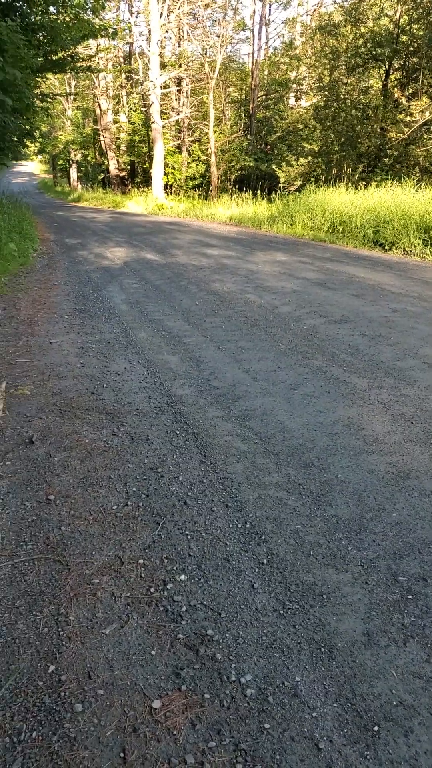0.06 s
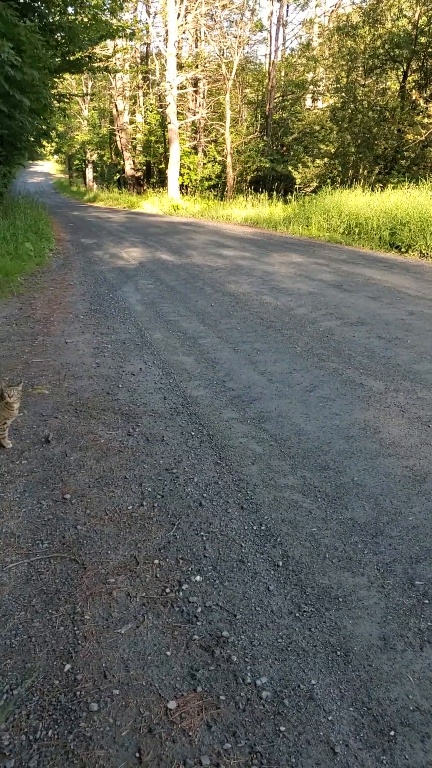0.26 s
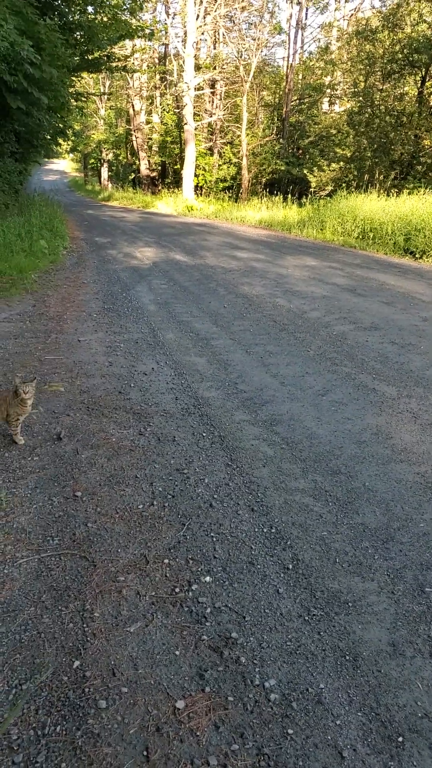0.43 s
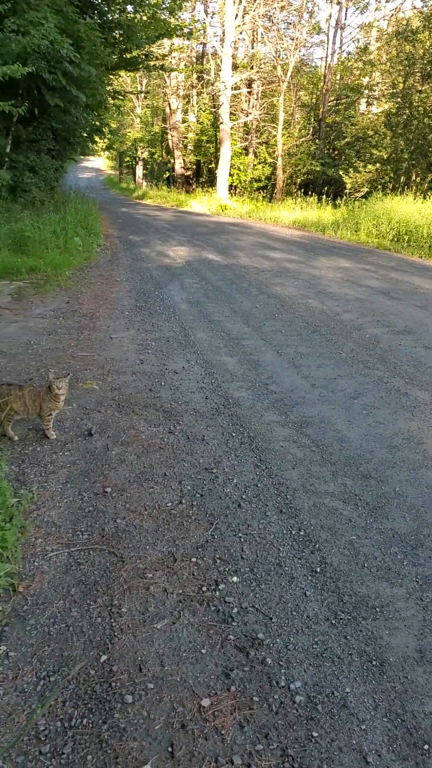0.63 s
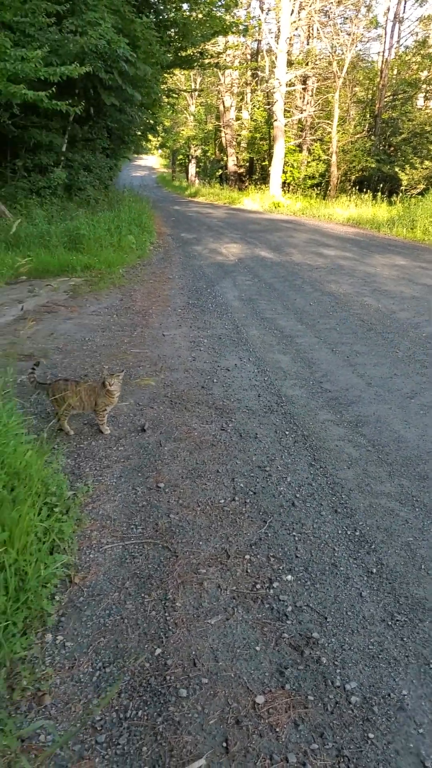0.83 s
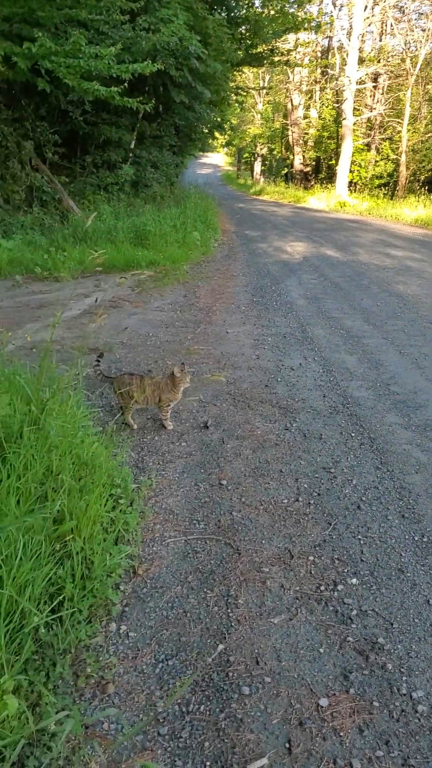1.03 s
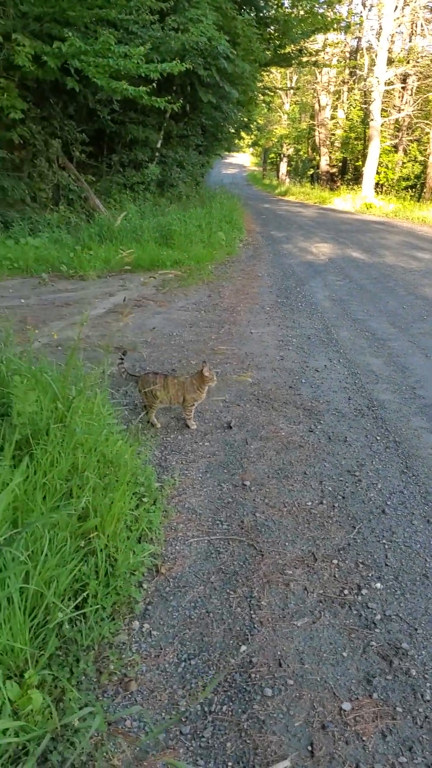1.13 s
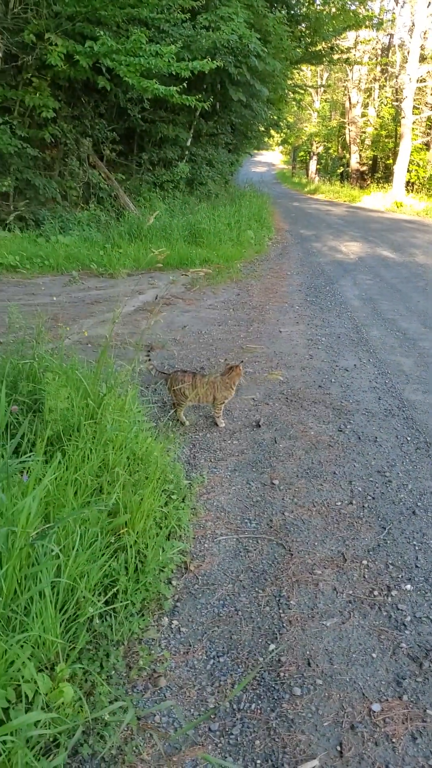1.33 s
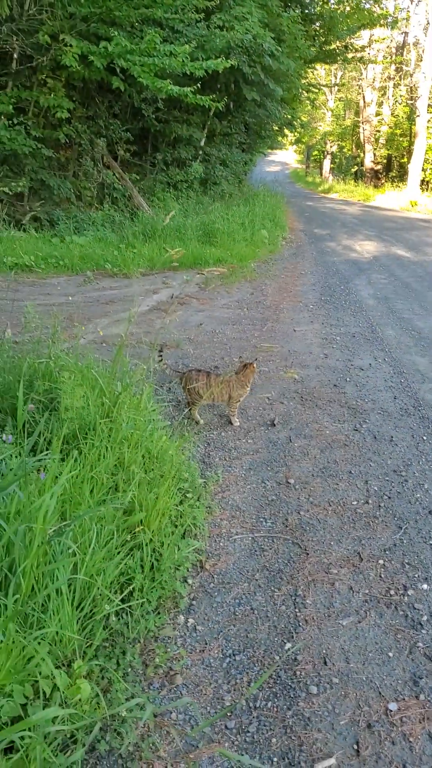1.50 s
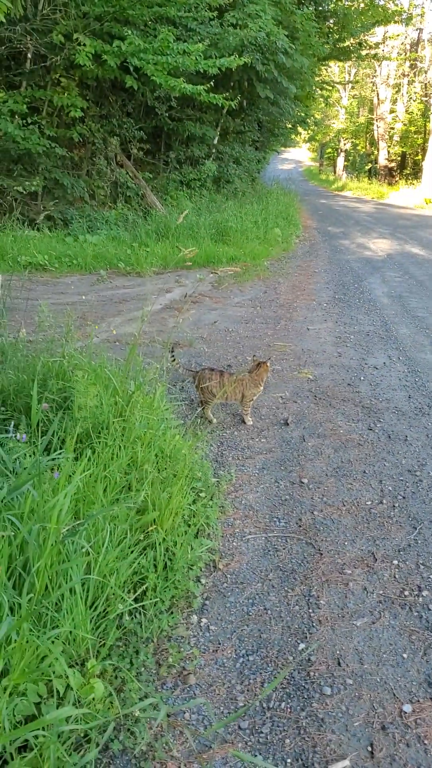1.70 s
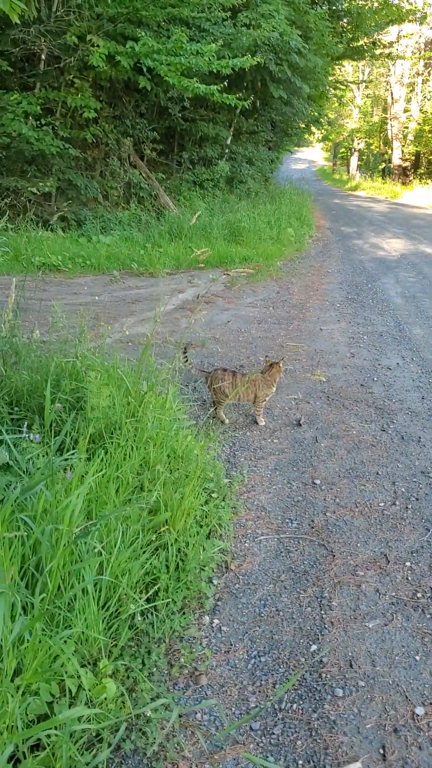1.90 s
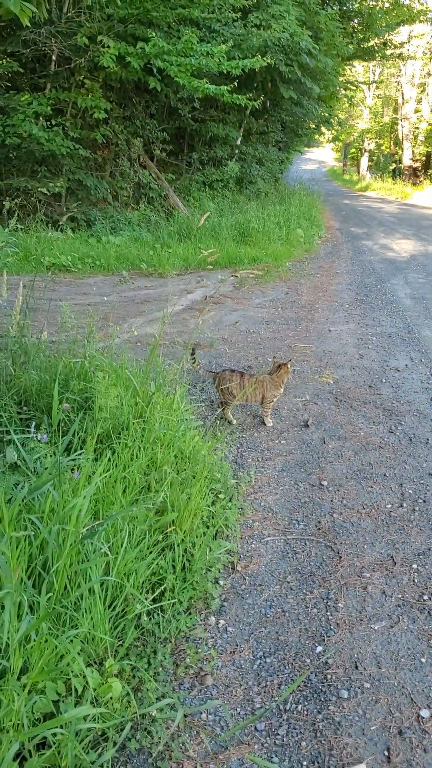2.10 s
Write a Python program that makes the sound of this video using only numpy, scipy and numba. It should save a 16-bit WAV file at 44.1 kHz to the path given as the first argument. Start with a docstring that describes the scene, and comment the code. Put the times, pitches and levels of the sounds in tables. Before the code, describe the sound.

Gravel grinds under slow steps as someone walks outdoors and then stops. Small stones click, scrape and clink, while fabric rustles and low handling bumps come through the close, handheld microphone. The surroundings are very quiet.

```python
"""Gravel crunches under slow steps: someone walks a road holding a phone and stops near the end.
Soles grind the stones, clothing swishes close by, single pebbles click, scrape and clink.
Steps thud through the low modes of the phone's body; the shifting grip rumbles between them.
The outdoor air is almost silent; a faint hum sets in at the end."""
import sys
import numpy as np
from scipy import signal
from scipy.fft import rfft, irfft
from scipy.io import wavfile
from scipy.ndimage import uniform_filter1d
from numba import njit

SR = 44100
rng = np.random.default_rng(int(sys.argv[2]) if len(sys.argv) > 2 else 0)


def persist_wave(psi):
    """Save psi, clipped to +-1, as 16-bit WAV."""
    counts = np.round(np.clip(psi, -1, 1) * 32767).astype(np.int16)
    wavfile.write(sys.argv[1], SR, np.atleast_2d(counts).T)


N = 94815

# limits of the low, middle and treble bands: edge_hz
EDGES_HZ = (260, 1400, 7500, 17000)
PORT_LAG_S = 0.000115  # left microphone port behind the right


def undb(db):
    """Decibels to gain."""
    return 10 ** (np.asarray(db) / 20)


def unit(x):
    """Scale to an rms of 1."""
    return x / np.sqrt(np.mean(x ** 2) + 1e-20)


def steady(x, samples):
    """Even out the level over a sliding window."""
    return x / np.sqrt(uniform_filter1d(np.mean(x ** 2, axis=0), size=samples) + 1e-12)


def colour(x, points, db_scale=1):
    """Minimum-phase filter through (freq_hz, gain_db) points."""
    size = 2 ** 17
    hz, db = np.array(points, float).T
    bins_hz = np.fft.rfftfreq(size, 1 / SR)
    gain = undb(db_scale * np.interp(np.log(bins_hz + 1), np.log(hz + 1), db))
    cepstrum = irfft(np.log(gain))
    cepstrum[1:size // 2] *= 2
    cepstrum[size // 2 + 1:] = 0
    return irfft(rfft(x, size) * np.exp(rfft(cepstrum)))[..., :N]


def stereo_noise(likeness):
    """Partly correlated noise that reaches the left port late."""
    mid, side = rng.standard_normal((2, N))
    mid *= np.sqrt((1 + likeness) / 2)
    side *= np.sqrt((1 - likeness) / 2)
    return np.array([np.roll(mid + side, round(PORT_LAG_S * SR)), mid - side])


def narrow_noise(hz, width_hz):
    """Unsteady band of noise around a pitch."""
    lowpass = signal.butter(2, width_hz / 2, fs=SR, output="sos")
    slow = signal.sosfilt(lowpass, rng.standard_normal((2, N)))
    carrier = np.exp(2j * np.pi * np.cumsum(hz * np.ones(N)) / SR)
    return unit(((slow[0] + 1j * slow[1]) * carrier).real)


def swell(peak_s, rise_s, fall_s):
    """Power of a push: grows to a peak, then dies ever faster, as when stones lock."""
    t = np.arange(N) / SR
    settling = 0.062
    away = np.maximum((peak_s - t) / rise_s, (t - peak_s) / fall_s).clip(max=20)
    return np.exp(-2 * (away + settling * np.maximum(away - 1, 0) ** 2))


@njit
def ring(start_s, hz, decay_s, size):
    """Sum of short damped sines."""
    out = np.zeros(N)
    for k in range(len(start_s)):
        first = int(start_s[k] * SR) + 1
        pole = 2j * np.pi * hz[k] / SR - 1 / (decay_s[k] * SR)
        phasor = size[k] * np.exp(pole * (first - start_s[k] * SR))
        step = np.exp(pole)
        for i in range(max(first, 0), min(N, first + int(6 * decay_s[k] * SR))):
            out[i] += phasor.imag
            phasor *= step
    return out


def grains(band, scatter_db):
    """Tiny contacts, each with its own pitch, size and direction; a few loose ones ring on."""
    # contacts per band, low to high: rate_per_s, decay_s
    contacts = [(600, 0.0021), (3200, 0.0007), (10000, 0.00007)]
    loose_share, loose_decay_s, loose_top_hz = 0.05, 0.015, 4160
    rate_per_s, decay_s = contacts[band]
    low_hz, high_hz = EDGES_HZ[band:band + 2]
    count = int(rate_per_s * N / SR)
    when, pitch, strength, polarity, damping, pan, lag = rng.random((24000, 7))[:count].T
    start_s = when * N / SR
    hz = low_hz + (high_hz - low_hz) * pitch
    loose = (damping < loose_share) & (hz < loose_top_hz)
    decays_s = np.where(loose, loose_decay_s, decay_s * (.5 + damping))
    size = undb(-scatter_db * np.log(np.maximum(strength, .01))) * np.sign(polarity - .5)
    size *= (decay_s / decays_s) ** .22
    pan_db = 4 * (2 * pan - 1)
    lag_s = PORT_LAG_S + .00007 * (2 * lag - 1)
    left = ring(start_s + lag_s, hz, decays_s, size * undb(pan_db))
    right = ring(start_s, hz, decays_s, size * undb(-pan_db))
    return steady(np.array([left, right]), samples=800)


def friction(pushes, scatter_db, hiss_db):
    """Grains over fine hiss in three bands, swelling with each push."""
    # spectrum of the rubbing: freq_hz, gain_db
    spectrum = [(330, -3), (410, -3), (478, 6.5), (630, -12), (720, -1.5), (820, 3.5), (960, -3),
                (1350, 2.5), (2200, 5.5), (2900, 5.5), (4400, 1), (6200, 0), (7700, -19), (9500, -21),
                (12800, -10), (16000, -19)]
    # hiss per band, low to high: left_right_correlation
    likeness = [0.92, 0.21, 0.21]
    power = sum(undb(db + np.array([[low_db], [0], [treble_db]])) ** 2 * swell(peak_s, rise_s, fall_s)
                for peak_s, rise_s, fall_s, db, low_db, treble_db in pushes)
    out = 0
    for band in range(3):
        low_hz, high_hz = EDGES_HZ[band:band + 2]
        bandpass = signal.butter(4, (low_hz, high_hz), "band", fs=SR, output="sos")
        grit = grains(band, scatter_db)
        hiss = undb(hiss_db) * stereo_noise(likeness[band]) * np.sqrt(SR / 2 / (high_hz - low_hz))
        texture = colour(signal.sosfilt(bandpass, grit + hiss), spectrum)
        out += unit(texture) * np.sqrt(power[band])
    return out


def crunches():
    """Gravel gives way under a sole; some grains stand out."""
    # pushes of the sole: peak_s, rise_s, fall_s, level_db, low_rel_db, treble_rel_db
    pushes = [(0.006, 0.013, 0.033, -57, -5.5, -12), (0.187, 0.0021, 0.0078, -45, -5, -8.5),
              (0.249, 0.023, 0.037, -43.5, -4.5, -13), (0.302, 0.043, 0.023, -50.5, 3.5, -3),
              (0.34, 0.034, 0.015, -53, 0, -9), (0.3555, 0.0038, 0.0081, -44.5, -9.5, -8),
              (0.423, 0.033, 0.011, -50, -6.5, -11.5), (0.449, 0.017, 0.024, -45.5, -12.5, -9),
              (0.482, 0.035, 0.0082, -46, -22, -7), (0.511, 0.0035, 0.0052, -48, -2.5, -17),
              (0.531, 0.005, 0.018, -56, -6, -13), (0.585, 0.015, 0.06, -56.5, -8, -6.5),
              (0.669, 0.035, 0.028, -48.5, -10, -6), (0.735, 0.081, 0.022, -53.5, -4.5, -12),
              (0.831, 0.015, 0.016, -47.5, -11.5, -10.5), (0.856, 0.0091, 0.014, -41.5, -14, -8.5),
              (0.871, 0.0087, 0.073, -50.5, -9, -8), (0.973, 0.0012, 0.012, -48.5, -3.5, -3.5),
              (1.081, 0.042, 0.19, -53, -11.5, -8), (1.121, 0.0086, 0.013, -44.5, -20.5, -4.5),
              (1.174, 0.051, 0.019, -50, -3, -17), (1.192, 0.0088, 0.023, -43.5, -11.5, -7.5),
              (1.245, 0.017, 0.025, -46.5, -7, -9.5), (1.33, 0.027, 0.031, -52.5, -2, -24),
              (1.404, 0.012, 0.02, -52, -5.5, -7), (1.492, 0.0027, 0.0061, -40, -8.5, 1.5),
              (1.555, 0.038, 0.063, -48.5, -6, -11.5), (1.171, 0.0026, .004, -41.5, -2, -16),
              (1.606, 0.0098, 0.011, -51, -11.5, -3.5), (1.921, 0.0013, 0.023, -49, -16.5, -10.5),
              (2.0, 0.042, 0.025, -57.5, -11, -8)]
    return friction(pushes, scatter_db=4, hiss_db=-4.5)


def air():
    """Faint outdoor air, mostly low."""
    # freq_hz, gain_db
    spectrum = [(40, 5), (200, 4.5), (400, -3), (1500, -21.5), (16000, -43)]
    return undb(-83.5) * unit(colour(stereo_noise(likeness=0.29), spectrum))


def grip_rumble():
    """The hand shifts on the phone in soft low bumps."""
    # handling noise: freq_hz, gain_db
    spectrum = [(25, -29), (66, -10.5), (97, 0.5), (135, -2.5), (210, 0.5), (255, -29), (800, -53.5)]
    # shifts of the hand: peak_s, level_db, fall_s
    bumps = [(.02, -68, 0.042), (.14, -61, 0.089), (.25, -50, 0.08), (.32, -43.5, 0.04), (.46, -56, 0.044),
             (.68, -56, 0.088), (.87, -56, 0.077), (1.12, -53.5, 0.017), (1.18, -47, 0.043),
             (1.32, -51.5, 0.042), (1.42, -54.5, .06), (1.52, -51, 0.069), (1.67, -56.5, 0.051),
             (1.95, -61, 0.12)]
    rise_s = 0.026
    noise = steady(colour(stereo_noise(likeness=0.95), spectrum), samples=1500)
    power = sum(undb(db) ** 2 * swell(peak_s, rise_s, fall_s) for peak_s, db, fall_s in bumps)
    return noise * np.sqrt(power)


def rustles():
    """Clothing and hand rub in smooth, hissy swishes."""
    # swishes: peak_s, rise_s, fall_s, level_db, low_rel_db, treble_rel_db
    swishes = [(.124, 0.03, 0.094, -56, -10.5, -8.5), (.277, 0.043, 0.006, -41.5, -22, -0.5),
               (.772, 0.011, 0.017, -47, -17.5, -11), (.81, 0.012, 0.011, -49, -18, 0),
               (1.012, 0.0082, 0.0048, -46, -22, -3.5), (1.292, 0.011, 0.026, -44.5, -20, 0),
               (1.476, 0.047, 0.051, -51.5, -8, -9), (1.648, 0.0046, 0.023, -46.5, -8.5, -3),
               (2.147, 0.064, .02, -63.5, -14.5, 1.5)]
    return friction(swishes, scatter_db=-7, hiss_db=-0.5)


def pebble_clicks():
    """Pebbles snap together and ring very briefly, each at a slightly different pitch."""
    # impacts: start_s, level_db, treble_rel_db
    impacts = [(0.248, -28, 5), (0.2663, -29.5, -9), (0.2758, -32.5, -1), (0.4664, -39, -6),
               (0.3548, -37, -10), (.8066, -42, -17), (.857, -37, -7), (0.9712, -38.5, 1),
               (1.0004, -41, -14), (1.010, -44, 10), (1.0121, -51, 20), (1.187, -37.5, 5),
               (1.4885, -41, 13), (1.4989, -36, 1), (1.5881, -31.5, 2.5), (1.6747, -38, 5),
               (1.8995, -50, -30)]
    # pebble modes: pitch_hz, gain_db, decay_s
    modes = [(2900, 0, .0005), (5400, 3, .00022), (13000, 3, .00022)]
    left_lag_s = .00006
    start_s, db, treble_db = np.array(impacts).T
    detunes = 1 + .08 * rng.uniform(-0.78, 1, (len(impacts), len(modes))).T
    out = 0
    for (hz, mode_db, decay_s), detune in zip(modes, detunes):
        size = undb(db + mode_db + treble_db * (hz > EDGES_HZ[2]))
        decays_s = np.full(len(impacts), decay_s)
        out += np.array([ring(start_s + lag_s, hz * detune, decays_s, size) for lag_s in (left_lag_s, 0)])
    return out


def step_thuds():
    """Soft pushes ring the held phone; the grip favours different modes from step to step."""
    # steps: start_s, push_db, grip_hz
    steps = [(0.28, -28, 119), (0.2905, -24, 187), (0.345, -41, 100), (.667, -45.5, 128),
             (0.853, -43.5, 172), (1.162, -41, 100), (1.486, -33.5, 151.7), (1.655, -41.5, 94)]
    # modes of the held phone: pitch_hz, gain_db, t60_s
    modes = [(99.7, -6.5, 0.41), (116, -10, 0.12), (134, -2.5, 0.25), (175.6, -7, 0.25), (194.4, 1, 0.16),
             (219.5, -14.5, 0.35), (465, 5, .2)]
    grip_db, grip_octaves = 9.5, 0.26
    push_s, low_cut_hz = 0.0051, 123
    t = np.arange(N) / SR
    out = 0
    for start_s, push_db, grip_hz in steps:
        push = np.sin(np.pi * np.clip((t - start_s) / push_s, 0, 1)) ** 2
        body = 0
        for hz, mode_db, t60_s in modes:
            lift_db = grip_db * np.exp(-(np.log2(hz / grip_hz) / grip_octaves) ** 2)
            body += undb(mode_db + lift_db - 60 * t / t60_s) * np.sin(2 * np.pi * hz * t)
        out -= undb(push_db) * signal.fftconvolve(push / push.sum(), body)[:N] / 2
    return signal.sosfilt(signal.butter(2, low_cut_hz, "high", fs=SR, output="sos"), out)


def scrape():
    """A slide speeds up, so its thin note rises."""
    # resonances: start_hz, level_db
    resonances = [(3150, -58.5), (11400, -64.5)]
    start_s, length_s, pitch_rise = .76, 0.058, 0.13
    progress = np.clip((np.arange(N) / SR - start_s) / length_s, 0, 1)
    glide = 1 + pitch_rise * progress
    note = sum(undb(db) * narrow_noise(hz * glide, width_hz=160) for hz, db in resonances)
    return note * np.sqrt(np.abs(np.sin(np.pi * progress)))


def pebble_clink():
    """A kicked pebble rocks and rings; its high modes die first."""
    # pebble modes: pitch_hz, gain_db
    modes = [(2140, -4), (3273, 2), (3690, 1), (4950, -4), (10800, -9)]
    peak_s, rise_s, fall_s, level_db = 1.924, .002, 0.039, -57
    lowest_hz = modes[0][0]
    out = np.zeros((2, N))
    for channel in out:
        for hz, db in modes:
            tone = steady(narrow_noise(hz, width_hz=58)[None], samples=1500)[0]
            power = swell(peak_s, rise_s, fall_s * np.sqrt(lowest_hz / hz))
            channel += undb(level_db + db) * tone * np.sqrt(power)
    return out


def hum():
    """A faint low hum sets in and wavers."""
    start_s, pitch_hz, level_db = 1.94, 189, -67
    t = np.arange(N) / SR
    fade_in = uniform_filter1d(1. * (t > start_s), size=900)
    return undb(level_db) * fade_in * steady(narrow_noise(pitch_hz, width_hz=4.1)[None], samples=900)


def scene():
    """Gravel, clothing and handling over faint outdoor air."""
    gravel = crunches() + pebble_clicks() + pebble_clink() + scrape()
    return gravel + rustles() + step_thuds() + grip_rumble() + hum() + air()


def record(dry):
    """The two microphone ports colour the sound differently; the top is cut."""
    # port colour, scaled per side: freq_hz, gain_db
    port_curve = [(200, 0.5), (480, 1), (800, -0.5), (2380, -4.5), (4400, 0.5), (6500, 3), (13000, 1.5)]
    top_hz = 16100
    left = colour(dry[0], port_curve, db_scale=0.99)
    right = colour(dry[1], port_curve, db_scale=-0.27)
    lowpass = signal.ellip(10, .2, 70, top_hz, fs=SR, output="sos")
    return signal.sosfilt(lowpass, np.array([left, right]))


dry = scene()
out = record(dry)
persist_wave(out)
```